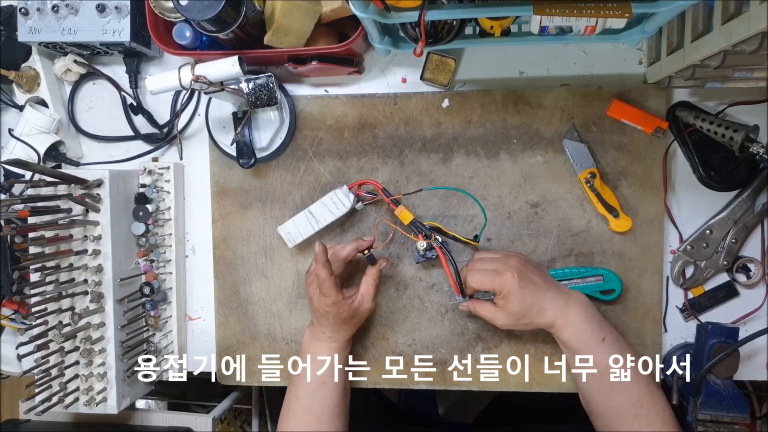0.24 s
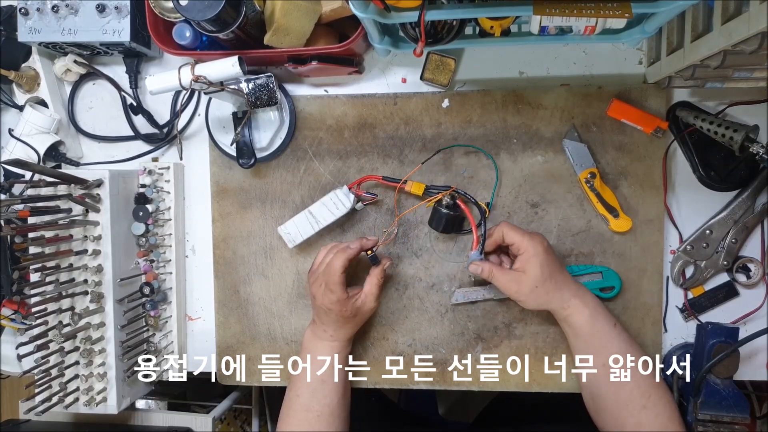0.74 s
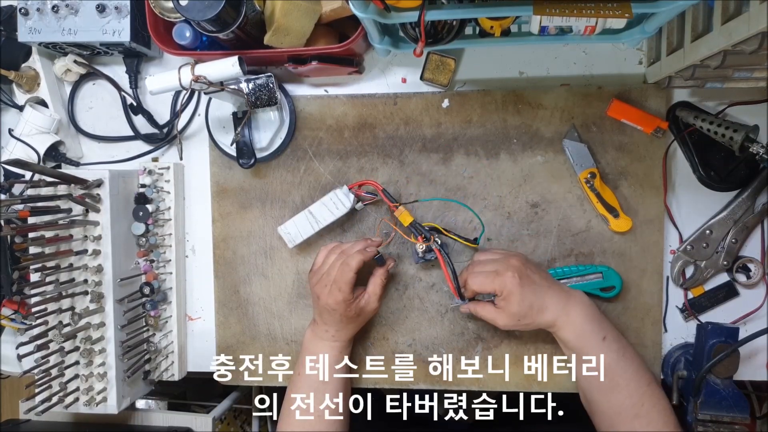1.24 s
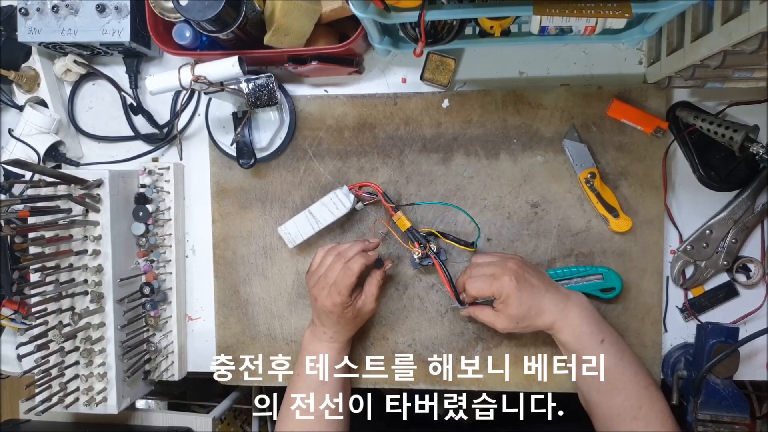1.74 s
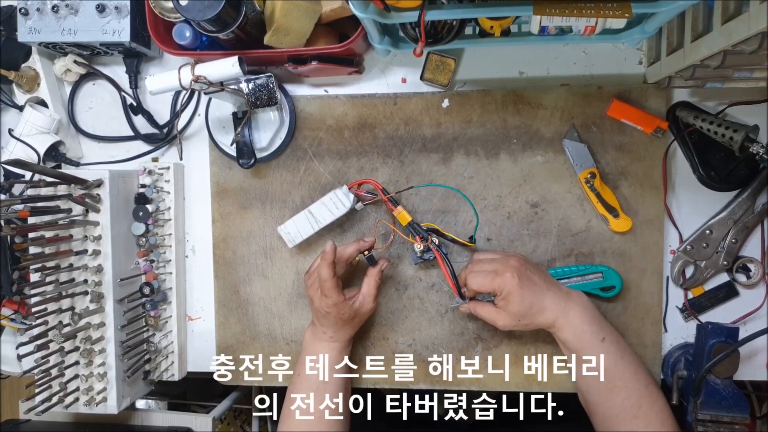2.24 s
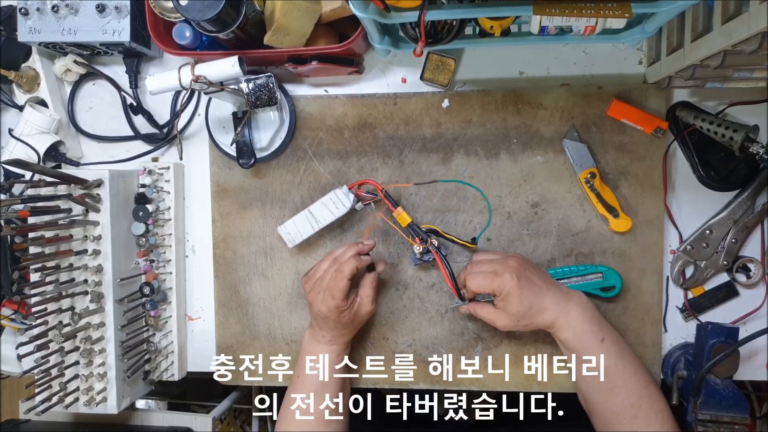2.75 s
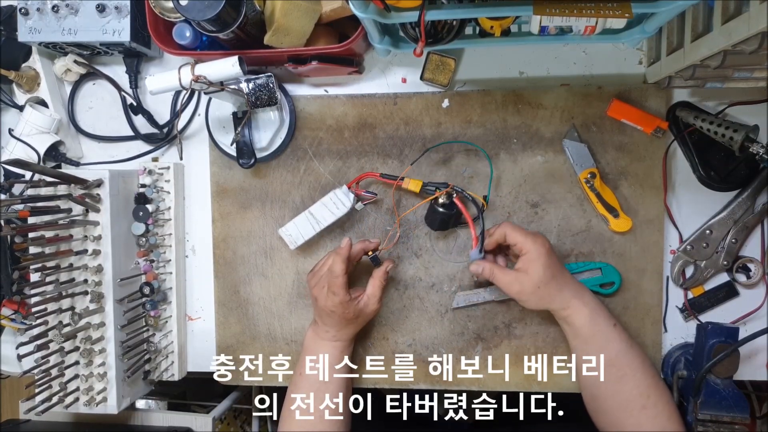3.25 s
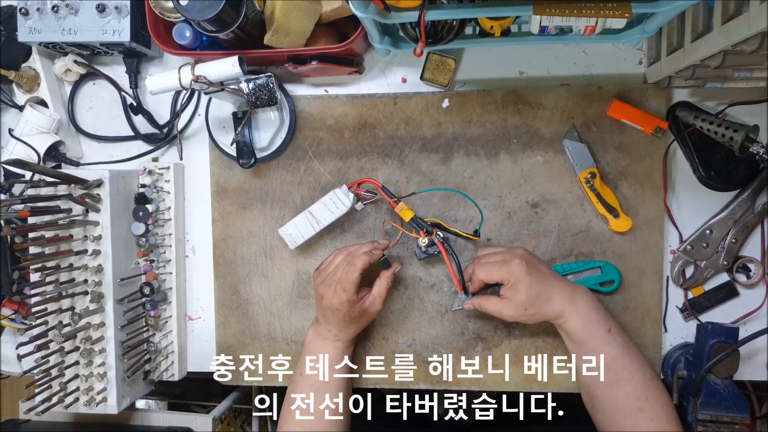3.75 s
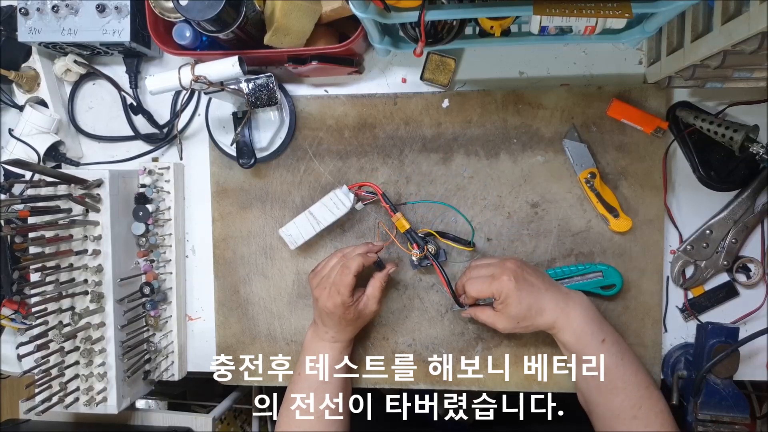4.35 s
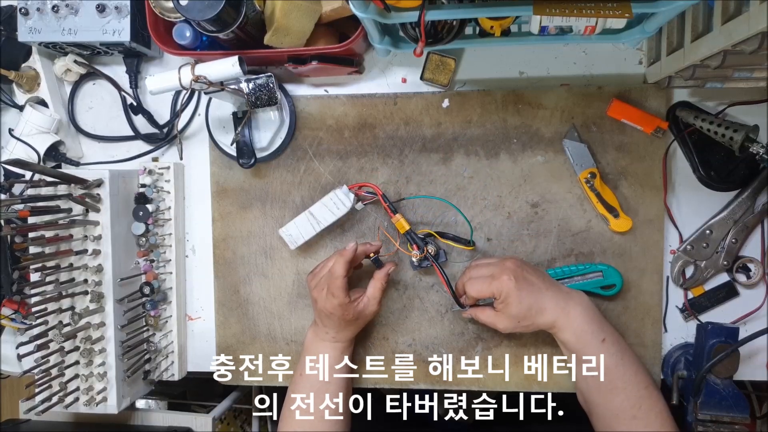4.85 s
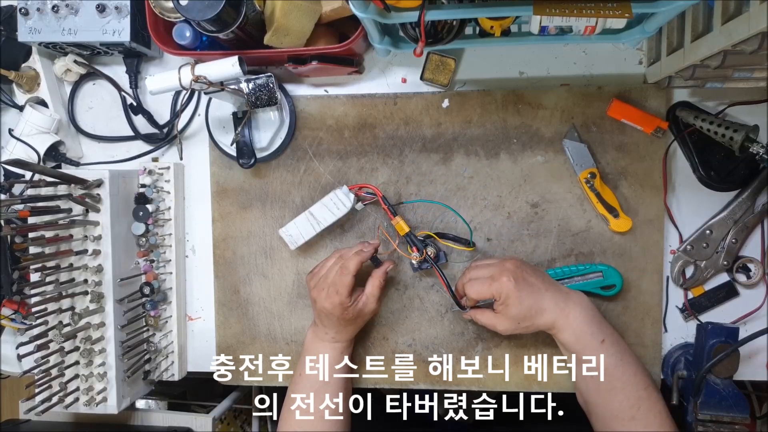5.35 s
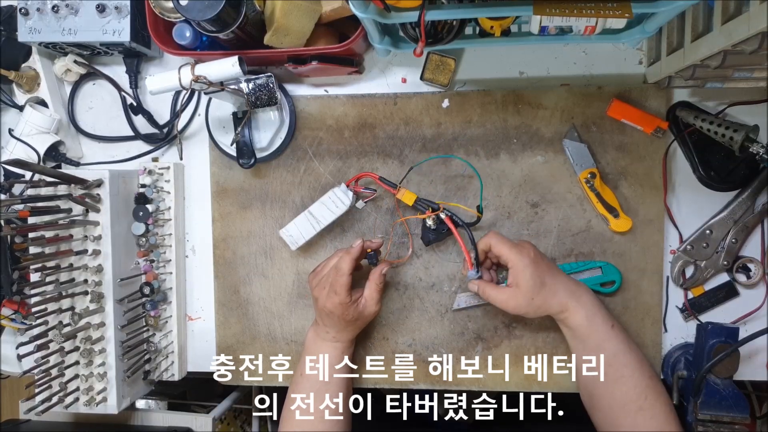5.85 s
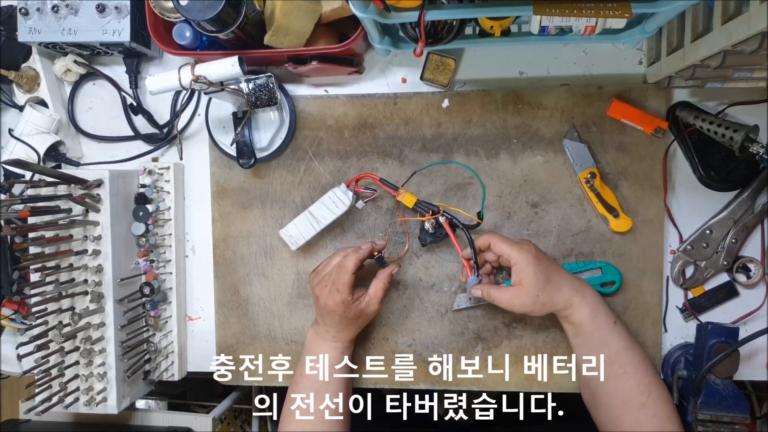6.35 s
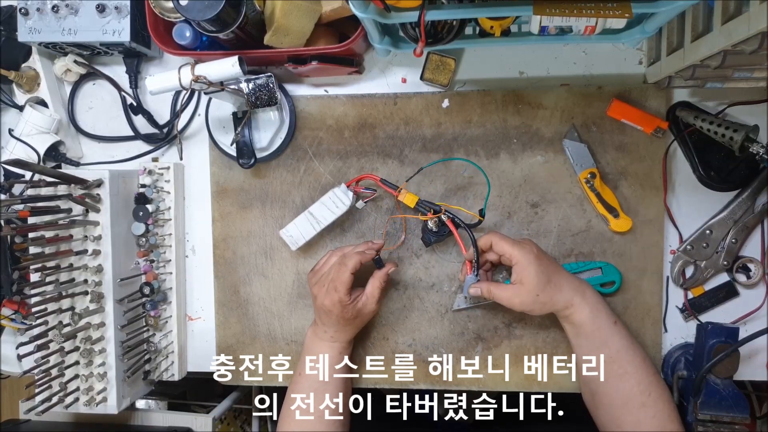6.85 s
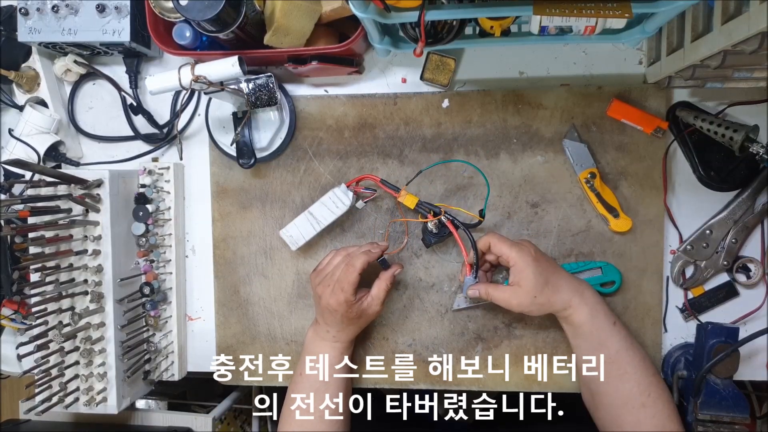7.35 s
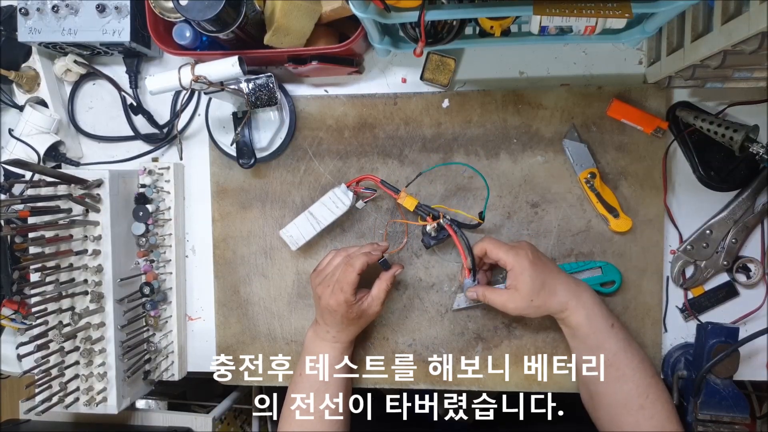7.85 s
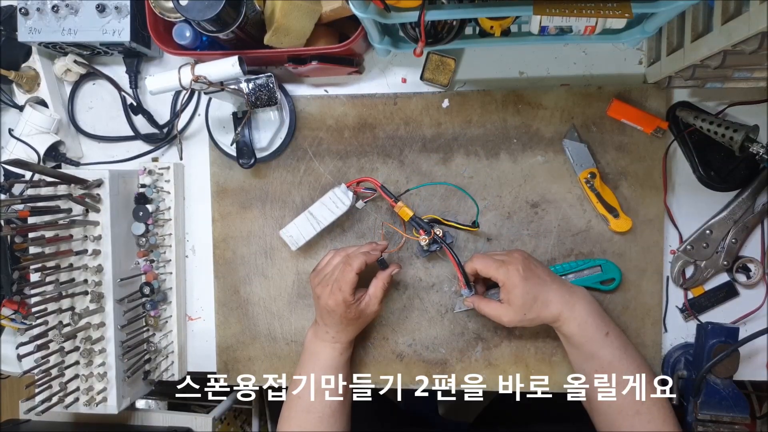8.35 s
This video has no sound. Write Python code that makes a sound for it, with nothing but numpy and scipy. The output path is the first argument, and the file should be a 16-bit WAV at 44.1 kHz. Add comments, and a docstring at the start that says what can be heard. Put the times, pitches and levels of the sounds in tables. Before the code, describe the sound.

Hard bright metallic clacks from a small relay, most followed by a softer click, with faint spark snaps and hand thuds over a low workshop hum.

```python
"""A relay on a wooden workbench slams in and drops out again: each blow sets a set of fading tones ringing.
Now and then a probe snaps a small spark on a metal strip, or is set down with a soft thud of the hand.
The blows flutter between the bench and a surface above it, an echo loop that gets duller each round.
They die away in a small cluttered workshop, made of fading noise. Behind them a motor hums as wavering
tones, and air rushes and rumbles as coloured noise that swells and sinks slowly."""
import sys
import numpy as np
from scipy import signal
from scipy.fft import rfft, irfft, next_fast_len
from scipy.io import wavfile

SR = 44100
rng = np.random.default_rng(int(sys.argv[2]) if len(sys.argv) > 2 else 0)


def ratio(d):
    """dB to gain"""
    e = np.asarray(d, float) / 20
    return 10 ** e


def file_out(sig):
    """Save sig as 16-bit WAV at sys.argv[1]."""
    # one column per channel
    cols = np.atleast_2d(sig).T
    # limit, then scale
    lim = np.clip(cols, -1, 1)
    pcm = np.round(lim * 32767).astype(np.int16)
    wavfile.write(sys.argv[1], SR, pcm)


N = 379701   # length in samples

# The relay's moving arm slams in: start_s, level_db, treble_tilt_db_per_octave
ARM_SLAMS = [(0.0501, -16.5, 0.6), (1.8826, -15, -0.5), (2.744, -15.5, -1.5), (4.4695, -15.5, -1),
             (5.5482, -14.5, 0.5), (6.8855, -17.5, 0.3), (8.487, -14.5, 0)]
# The arm falls back on its stop: start_s, level_db
ARM_DROPS = [(0.2472, -24.5), (2.1336, -25.5), (2.9666, -25.5), (4.6987, -25.5), (5.7263, -25.5),
             (7.0078, -25)]
# Small sparks at the probe tip: start_s, level_db
SPARK_SNAPS = [(1.1167, -40.5), (3.811, -40), (8.058, -38)]
# A faint bright tick: start_s, level_db
FAINT_TICKS = [(3.7263, -64)]
# Hand and probe land on the bench: start_s, fingertip_level_db, hand_weight_level_db
HAND_LANDINGS = [(0.4633, -38.5, -31), (3.181, -34, -29), (5.829, -38, -33.5)]

# Tones of each thing that is hit: pitch_hz, relative_level_db, ring_s (time to fall by 60 dB)
CORE_TONES = [(1220, -27.5, 0.0023), (1877, -17.5, 0.0038), (2375, -11.5, 0.0031), (3410, -5.5, 0.0025),
              (4480, -1.5, 0.0034), (5400, -4.5, 0.0027), (3910, -35, 0.039), (3990, -23.5, 0.031),
              (4980, -32, 0.026), (5360, -30, 0.019), (5450, -33, 0.045), (7580, -29, 0.056),
              (6950, -4.5, 0.0018), (8700, -7.5, 0.0033), (10660, -9.5, 0.0039), (12180, -14.5, 0.013),
              (13740, -15.5, 0.006), (15300, -13.5, 0.0022)]
STOP_TONES = [(965, -17, 0.0063), (1680, -6.5, 0.0041), (2130, -0.5, 0.0029), (3170, -6.5, 0.0037),
              (4100, -8, 0.0035), (5750, -5.5, 0.0014), (7960, -19, 0.0038), (9100, -16.5, 0.0033),
              (11400, -12, 0.0033), (12700, -11, .002), (14800, -12.5, 0.0016)]
CONTACT_TONES = [(5400, -6, 0.0057), (7300, -3.5, 0.0027), (8800, 0, 0.0024), (12000, -4.5, .002),
                 (14000, -8, 0.0018)]
STRIP_TONES = [(1920, -9, 0.0057), (3470, -8, 0.0075), (4530, -4.5, 0.0038), (6630, -3.5, 0.0041),
               (7700, -6.5, 0.0086), (8680, -2.5, 0.0042), (11800, 0.5, 0.0021), (13370, -5, .002),
               (15070, -7.5, .002)]
BENCH_TONES = [(139.6, 3, 0.2), (303, -2, 0.041), (208, -21, 0.16), (505, -6.5, 0.013), (937, -9, 0.008),
               (1160, -10, 0.0044), (1800, -20, 0.0021), (2800, -21, 0.0026), (6080, -22.5, 0.00077),
               (10880, -29, 0.00067)]
# How much louder the left is than the right near the bench: pitch_hz, left_over_right_db
LEFT_RIGHT_BALANCE = [(150, -2), (640, 0.5), (1400, 3.5), (3100, 3.5), (5000, 1), (7000, -2), (9500, -5.5),
                      (12000, -2), (15000, -1.5)]

# Room decay, as times to fall by 60 dB: pitch_hz, early_decay_s, late_decay_s, level_db
ROOM_DECAY = [(100, 0.13, .6, -11.5), (400, 0.36, .6, -3), (1000, 0.22, 0.68, -0.5), (3000, 0.21, 0.91, 2),
              (6000, 0.22, .55, 0), (15000, 0.24, 0.49, -1.5)]
# Motor and fan tones: pitch_hz, level_db (rms, before wavering), waver_db
MOTOR_TONES = [(64.3, -62, 1.5), (96.4, -48.5, .7), (160.7, -66, 1.5), (289.2, -52.5, 1.8),
               (385.6, -62, 1.5), (417.8, -64, 1.5), (473.5, -61, 2.5), (576, -61, 2.5)]
# Colour of the low rumble: pitch_hz, relative_level_db (per Hz)
RUMBLE_COLOUR = [(25, -37), (45, -14.5), (72, -4), (100, -4), (125, -13), (250, -12.5), (340, -15),
                 (400, -17), (470, -3), (580, -2.5), (630, -8.5), (705, -8.5), (740, -26), (900, -59.5)]
# Colour of the rushing air: pitch_hz, relative_level_db (per Hz)
RUSH_COLOUR = [(600, -38.5), (740, -14.5), (900, -2), (1000, -11), (1150, -6), (1600, -11), (1800, -8),
               (2200, -12.5), (3050, -14.5), (3400, -23), (4600, -25), (7000, -33.5), (10000, -40.5),
               (10600, -41.5), (16500, -48)]
# Slow swell of rush and rumble: time_s, change_db
NOISE_SWELL = [(0.0, -2), (0.62, 1.5), (2.1, 0.14), (2.97, 1), (5.23, 0.32), (6.45, -1), (7.65, -0.8),
               (8.25, 2), (8.61, -1)]
# How alike the noise is in left and right: pitch_hz, likeness (0 to 1)
NOISE_LIKENESS = [(60, 0.56), (300, .85), (700, 0.68), (1500, 0.14), (3000, 0.3), (6000, 0.49), (15000, .1)]

BUTTON_LEAD_S, BUTTON_DB = 0.0115, -50   # the push button clicks, then the coil needs a moment to pull
CONTACT_LEAD_S, CONTACT_DB = 0.0035, -37.5   # the contacts part before the arm lands on its stop
REBOUND_S = 0.0016   # the arm hops once after landing
WEIGHT_LAG_S, WEIGHT_RISE_S = 0.007, 0.003   # the hand's weight follows the fingertip
STOP_TILT_DB, CONTACT_TILT_DB, SPARK_TILT_DB, TOUCH_TILT_DB = 1.5, 1, -2, 3   # treble tilt per octave
BENCH_LAG_S = 0.00003   # the bench lies a little nearer the right microphone port
FLUTTER_S, FLUTTER_DB, FLUTTER_CUT_HZ = 0.00456, -6, 11000
EARLY_DB, LATE_DB = -4, -30.5   # strength of the fast and slow room decay
LEFT_LAG_S, RUMBLE_LAG_S = 0.00031, 0.0001   # motor and rush, then rumble, reach the left later
RUMBLE_DB, RUSH_DB = -45.5, -52.5   # rms before the slow swell
PORT_NOTCH_HZ, PORT_NOTCH_WIDTH_HZ, PORT_NOTCH_DEPTH = 6150, 330, 0.7
MIC_CUT_HZ, TOP_CUT_HZ = 40, 16700


def at_hz(points, hz, axis=1):
    """Read a table column between its pitches, with pitch on a logarithmic scale."""
    points = np.array(points)
    return np.interp(np.log(hz + 1e-9), np.log(points[:, 0]), points[:, axis])


def ring(clicks, hz, ring_s):
    """A struck body swings at its own pitch and fades: a unit click starts a fading sine of height 1."""
    shrink = ratio(-60 / (max(ring_s, 1e-3) * SR))   # no ring is shorter than 1 ms
    turn = 2 * np.pi * hz / SR
    return signal.lfilter([0, np.sin(turn)], [1, -2 * shrink * np.cos(turn), shrink ** 2], clicks)


def strike(times, levels_db, modes, clatter_db, clatter_s, alike, tilts_db=0, rebound_db=-90, rise_s=0.0):
    """Contact and fading clatter set tones ringing; rows: left, right, and what goes all round the room."""
    out = np.zeros((3, N + SR))
    t = np.arange(SR // 4) / SR
    half = np.array([[0.5], [-0.5], [0]])   # splits a left-right difference over the rows
    middle_hz = modes[len(modes) // 2][0]   # the treble tilt turns about this tone
    for start_s, db, slope_db in np.broadcast(times, levels_db, tilts_db):
        shared, left, right = rng.standard_normal((3, len(t))) ** 3   # cubing makes the clatter spiky
        # averaged over all directions the bounces leave no colour, so the room row gets none
        own = np.array([left, right, 0 * t])
        mixed = np.sqrt(alike) * shared * 2 * abs(half) + np.sqrt(1 - alike) * own
        bounces = mixed * ratio(clatter_db - 60 * t / clatter_s)
        bounces[:, 0] = 1   # the sharp first contact
        bounces[:2, round(REBOUND_S * SR)] += ratio(rebound_db)
        push = np.hanning(int(rise_s * SR) + 3)[1:]   # a soft contact spreads the push over time
        bounces = signal.lfilter(push, [1], bounces)

        blow = 0
        for k, (hz, mode_db, ring_s) in enumerate(modes):
            tilt_db = slope_db * np.log2(hz / middle_hz)
            side_db = half * at_hz(LEFT_RIGHT_BALANCE, hz) + rng.normal(0, 2.0, (3, 1))
            tone = ratio(mode_db + tilt_db + side_db) * ring(bounces, hz, ring_s)
            blow = blow + (-1) ** k * tone   # every second tone starts the other way

        # the first 10 ms set the level: left and right together, the room row by itself
        left_power, right_power, room_power = np.mean(blow[:, :SR // 100] ** 2, axis=1)
        near_power = (left_power + right_power) / 2
        size = ratio(db) / np.sqrt([[near_power], [near_power], [room_power]])
        start = round(start_s * SR)
        out[:, start:start + len(t)] += blow * size
    return out[:, :N]


def relay():
    """The arm hits the core or falls on its stop; a button click and parting contacts come just before."""
    in_s, in_db, in_tilt_db = np.transpose(ARM_SLAMS)
    out_s, out_db = np.transpose(ARM_DROPS)
    button = strike(in_s - BUTTON_LEAD_S, BUTTON_DB, CONTACT_TONES,
                    clatter_db=-7.5, clatter_s=0.0073, alike=0.3)
    core = strike(in_s, in_db, CORE_TONES, clatter_db=-34, clatter_s=0.045, alike=0.3,
                  tilts_db=in_tilt_db, rebound_db=-4)
    contact = strike(out_s - CONTACT_LEAD_S, CONTACT_DB, CONTACT_TONES,
                     clatter_db=-4.5, clatter_s=0.034, alike=0.27, tilts_db=CONTACT_TILT_DB)
    stop = strike(out_s, out_db, STOP_TONES, clatter_db=-26, clatter_s=0.012, alike=0.5,
                  tilts_db=STOP_TILT_DB, rebound_db=-14)
    return button + core + contact + stop


def probe():
    """Sparks ring the strip, a faint tick sounds, and the hand lands on the bench: touch, then weight."""
    sparks = strike(*np.transpose(SPARK_SNAPS), STRIP_TONES,
                    clatter_db=-12.5, clatter_s=0.09, alike=0.12, tilts_db=SPARK_TILT_DB)
    tick = strike(*np.transpose(FAINT_TICKS), CONTACT_TONES,
                  clatter_db=-16.2, clatter_s=0.03, alike=0.15)
    start_s, touch_db, weight_db = np.transpose(HAND_LANDINGS)
    # the light touch leaves out the first two bench tones
    touch = strike(start_s, touch_db, BENCH_TONES[2:],
                   clatter_db=-12, clatter_s=0.034, alike=0.9, tilts_db=TOUCH_TILT_DB)
    weight = strike(start_s + WEIGHT_LAG_S, weight_db, BENCH_TONES, clatter_db=-54, clatter_s=0.0077,
                    alike=0.9, tilts_db=TOUCH_TILT_DB, rise_s=WEIGHT_RISE_S)
    return sparks + tick + touch + weight


def flutter(sound):
    """Sound bounces between the bench and the surface above, weaker and duller each round."""
    lag = round(FLUTTER_S * SR)
    dull = np.exp(-2 * np.pi * FLUTTER_CUT_HZ / SR)
    feedback = np.zeros(lag + 1)
    feedback[[0, 1, lag]] = 1, -dull, -ratio(FLUTTER_DB) * (1 - dull)
    click = np.arange(SR // 8) == 0
    echoes = signal.lfilter([1, -dull], feedback, click)
    return signal.fftconvolve(sound, echoes[None], axes=1)[:, :N]


def workshop(sound):
    """Dense reflections: octave bands of noise fade at a fast and a slow rate, unrelated left and right."""
    t = np.arange(SR * 3 // 4) / SR
    response = 0
    for hz in 88 * 2. ** np.arange(8):
        octave = signal.butter(2, [hz / np.sqrt(2), hz * np.sqrt(2)], "band", fs=SR, output="sos")
        noise = signal.sosfilt(octave, rng.standard_normal((2, len(t))))
        early_s, late_s = at_hz(ROOM_DECAY, hz), at_hz(ROOM_DECAY, hz, axis=2)
        # the square roots keep a longer decay from carrying more energy
        early = ratio(EARLY_DB - 60 * t / early_s) / np.sqrt(early_s)
        late = ratio(LATE_DB - 60 * t / late_s) / np.sqrt(late_s)
        response = response + noise * (early + late) * ratio(at_hz(ROOM_DECAY, hz, axis=3))
    thicken = np.minimum(t / 0.006, 1)   # reflections build up over the first 6 ms
    response *= thicken * np.sqrt(6 * np.log(10) / SR)
    return signal.fftconvolve(sound, response, axes=1)[:, :N]


def drift(rate):
    """Slow wandering: random values of spread 1, two times rate per second, joined by straight lines."""
    steps = rng.standard_normal(int(N / SR * rate * 2) + 3)
    return np.interp(np.arange(N) / SR * rate * 2, np.arange(len(steps)), steps)


def motor():
    """Motor and fan tones, mostly multiples of the shaft rate, each wavering in level and phase."""
    t = np.arange(N) / SR - LEFT_LAG_S * np.array([[1], [0]])
    hum = 0
    for hz, db, waver_db in MOTOR_TONES:
        level = np.sqrt(2) * ratio(db + waver_db * drift(4.0))
        hum = hum + level * np.sin(2 * np.pi * hz * t + 0.5 * drift(1.5))
    return hum


def air(colour, level_db, lag_s):
    """Steady noise shaped by pitch: part is common to both sides, reaching the left later."""
    size = next_fast_len(N)
    hz = np.arange(size // 2 + 1) * SR / size
    common, left, right = rfft(rng.standard_normal((3, size)))
    alike = at_hz(NOISE_LIKENESS, hz)
    delayed = common * np.exp(-2j * np.pi * hz * lag_s * np.array([[1], [0]]))
    sides = np.sqrt(alike) * delayed + np.sqrt(1 - alike) * np.array([left, right])
    noise = irfft(sides * ratio(at_hz(colour, hz)), size)[:, :N]
    return noise * ratio(level_db) / noise.std()


def scene():
    """Relay and probe blows pass through flutter and room, over motor hum and moving air."""
    blows = relay() + probe()
    samples = np.arange(N)
    blows[0] = np.interp(samples - BENCH_LAG_S * SR, samples, blows[0])   # left arrives later
    swell = ratio(np.interp(samples / SR, *np.transpose(NOISE_SWELL)))
    noise = air(RUMBLE_COLOUR, RUMBLE_DB, RUMBLE_LAG_S) + air(RUSH_COLOUR, RUSH_DB, LEFT_LAG_S)
    return flutter(blows[:2]) + workshop(blows[2:]) + motor() + swell * noise


def band_limit(x):
    """A steep low-pass at the top of the band."""
    return signal.sosfilt(signal.butter(12, 17000, fs=SR, output="sos"), x)


def record(dry):
    """The microphone port dips part of the treble; deep bass and top are cut, and peaks are rounded."""
    port_band = signal.lfilter(*signal.iirpeak(PORT_NOTCH_HZ, PORT_NOTCH_HZ / PORT_NOTCH_WIDTH_HZ, SR), dry)
    sound = dry - PORT_NOTCH_DEPTH * port_band
    bass_cut = signal.butter(2, MIC_CUT_HZ, "high", fs=SR, output="sos")
    top_cut = signal.cheby2(14, 50, TOP_CUT_HZ, fs=SR, output="sos")   # 50 dB down from this pitch up
    sound = signal.sosfilt(top_cut, signal.sosfilt(bass_cut, sound))
    mix = 2.48 * np.tanh(sound / 2.423)
    return band_limit(mix)


dry = scene()
out = record(dry)
file_out(out)
```